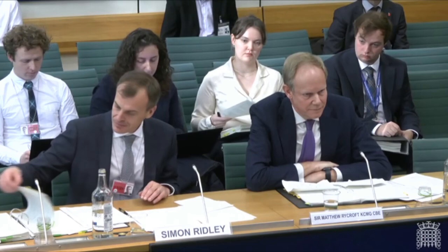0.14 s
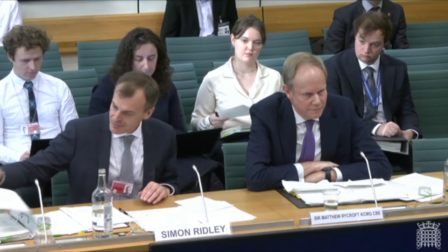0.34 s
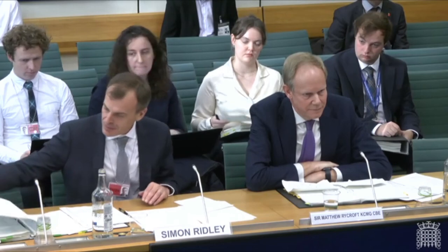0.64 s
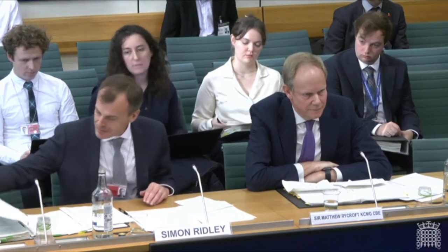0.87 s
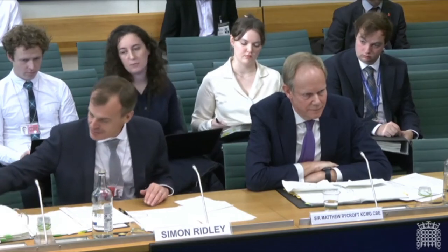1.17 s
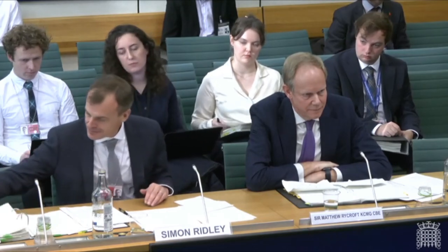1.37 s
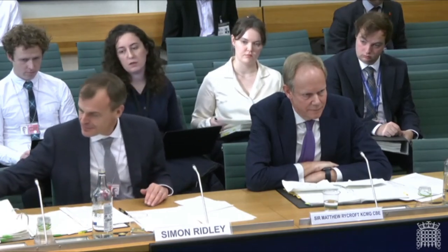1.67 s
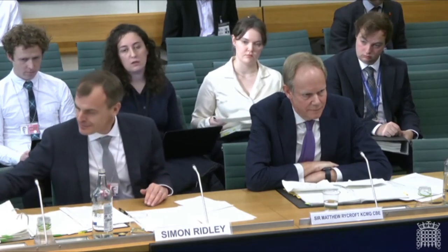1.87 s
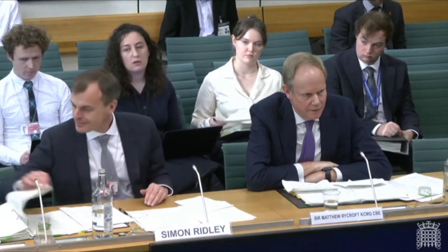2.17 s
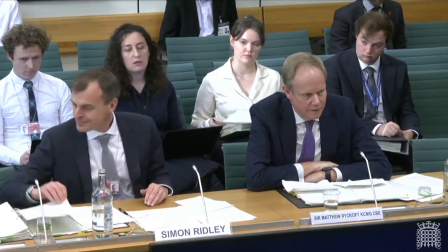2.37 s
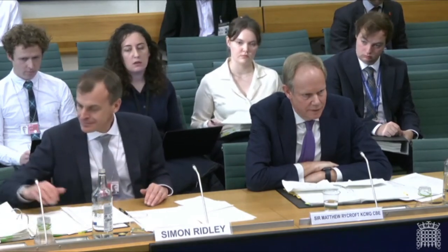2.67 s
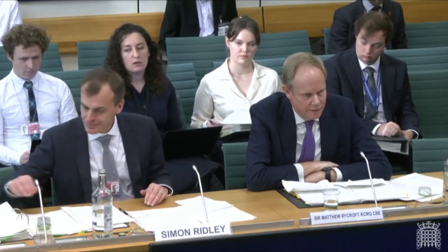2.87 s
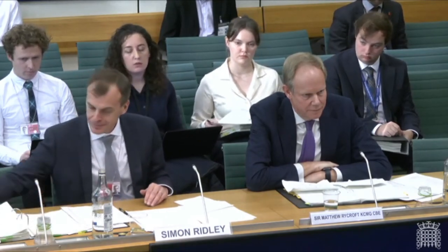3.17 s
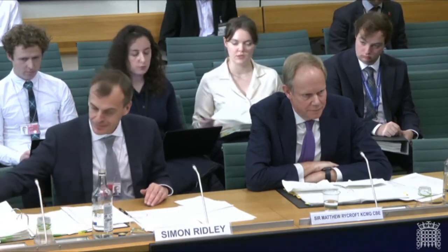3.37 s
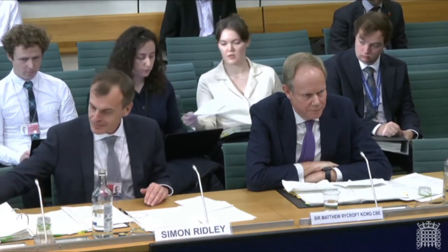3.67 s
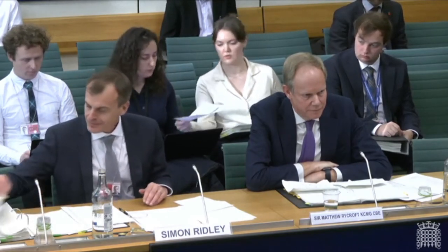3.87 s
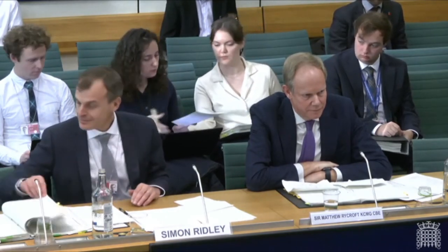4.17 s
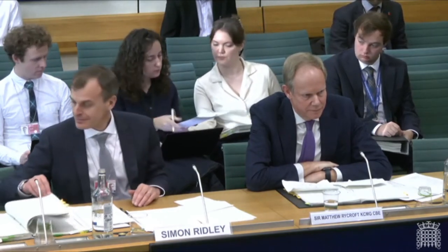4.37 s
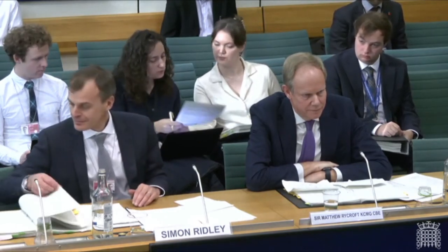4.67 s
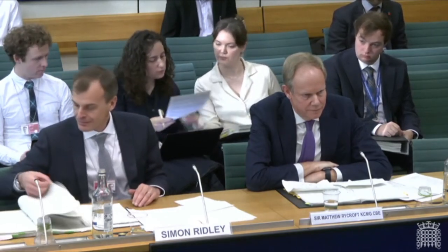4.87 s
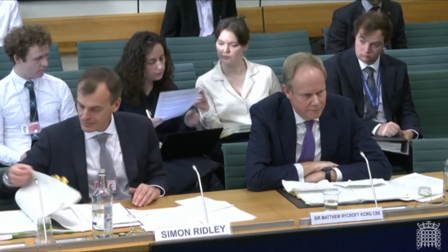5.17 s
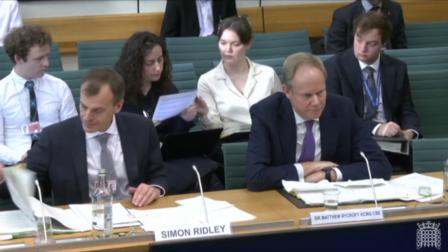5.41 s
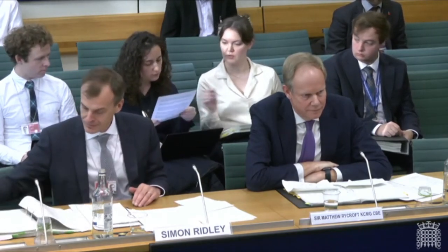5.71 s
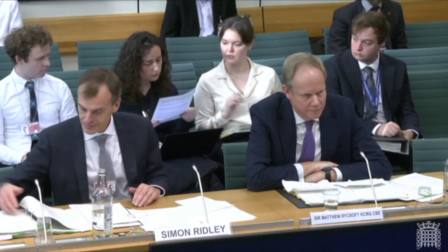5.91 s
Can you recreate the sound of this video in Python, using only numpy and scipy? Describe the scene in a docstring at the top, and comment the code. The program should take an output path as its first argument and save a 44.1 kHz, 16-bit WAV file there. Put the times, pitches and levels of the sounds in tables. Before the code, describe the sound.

A quiet meeting room heard through a desk microphone very near a thick file of paper. A very low, wavering hum and faint dull ventilation run throughout. From 0 to 1.3 seconds sheets slide softly, with a small snap and low knock at 0.7. At 1.4 a crisp crease and firm dull desk knock land together, followed by light rustling and ticks. Around 2.3 to 2.8 a falling page pushes air onto the microphone: a massive, deep, shuddering thump that briefly pulls down all other sound. From 3.0 knocks return, with a dense burst of sharp crackles and brushing paper at 3.35 to 3.6. It calms until a bright snap at 4.24, then rustling strokes and strong papery cracks at 4.8 and 4.95. Lighter page sliding follows, with a softer low air thud around 5.6 to 5.7 and a fading rustle to 6.

```python
"""A quiet meeting room, with a desk microphone close beside a thick file whose pages are lifted, slid and turned.
Strokes of sheet are swelling friction noise, creases snap as clicks in short noise, knocks ring the desk's modes.
A very low sine hum and coloured-noise ventilation lie underneath.
Twice a falling page blows on the capsule as pushes and suctions of air; the first time it also shakes
the microphone stem, and the limiter ducks everything."""
import sys
import numpy as np
from scipy import signal
from scipy.fft import rfft, irfft, next_fast_len
from scipy.io import wavfile
from scipy.ndimage import uniform_filter1d, minimum_filter1d, map_coordinates

SR = 44100
rng = np.random.default_rng(int(sys.argv[2]) if len(sys.argv) > 2 else 0)


def waveform_to_disk(signal):
    """Save audio, clipped to [-1, 1], as 16-bit WAV at the path in sys.argv[1]."""
    frames = np.transpose(np.atleast_2d(signal))
    scaled = np.clip(frames, -1, 1) * 32767
    samples = np.round(scaled).astype(np.int16)
    wavfile.write(sys.argv[1], SR, samples)


N = 266540
T = np.arange(N) / SR  # time of every sample [s]

# level of the low hum before it wavers: (time [s], level [dB])
HUM_LEVEL = [(0, -11), (1, -14), (2.4, -12.5), (3.1, -22), (4.1, -23.5), (4.42, -16.5), (4.62, -30.5),
             (4.9, -36.5), (5.06, -15.5), (6.04, -15.5)]
# level of the ventilation: (time [s], level [dB])
VENT_LEVEL = [(0, -37.5), (2.3, -37), (2.9, -45), (4.1, -42), (6.04, -41.5)]
# colour of the ventilation: (frequency [Hz], density [dB per Hz])
VENT_COLOUR = [(25, 0), (60, 4.5), (120, -.5), (210, -2.5), (300, -10), (500, -16), (1000, -25),
               (2000, -30), (4000, -40), (13000, -43.5)]

# strokes of a sliding sheet, levels before the paper colour:
# (peak time [s], rise [s], fall [s], flexing level [dB], rubbing level [dB], rubbing pitch [Hz],
#  edge hiss level [dB])
STROKES = [(0.119, 0.32, 0.62, -59, -67, 3370, -55.5), (.6, 0.1, 0.21, -56, -56.5, 3600, -63),
           (1.165, 0.048, 0.19, -48.5, -51.5, 3160, -55), (1.45, 0.23, 0.29, -44, -45, 3040, -49),
           (1.78, 0.26, .15, -55, -54, 3380, -43), (1.88, 0.11, 0.2, -53.5, -51, 2850, -53),
           (2.245, 0.032, 0.05, -45, -50.5, 3400, -51), (2.315, 0.022, 0.11, -42, -46, 3600, -37.5),
           (2.434, 0.095, 0.078, -36, -37, 1460, -74), (2.519, 0.097, 0.093, -43.5, -45, 2000, -70),
           (2.648, 0.068, 0.16, -36, -42, 1600, -70), (2.829, 0.33, 0.15, -57, -51.5, 4330, -75),
           (3.02, 0.18, 0.17, -45, -43, 3350, -42), (3.1, 0.047, 0.14, -44.5, -48, 3000, -45),
           (3.3, 0.33, 0.22, -65, -48.5, 2600, -47.5), (3.364, 0.023, 0.064, -35, -31, 2450, -34),
           (3.402, 0.052, 0.056, -33.5, -24.5, 1970, -51), (3.475, 0.06, 0.087, -41.5, -37, 2770, -50),
           (3.57, 0.056, 0.28, -49.5, -55, 3060, -64), (4.01, 0.11, 0.23, -63, -51, 4470, -51),
           (4.27, 0.14, 0.25, -47, -42.5, 3860, -48), (4.421, 0.09, 0.13, -42, -40, 2840, -45),
           (4.68, 0.24, 0.16, -47, -45.5, 2120, -50), (4.829, 0.12, 0.2, -40.5, -29.5, 3000, -38),
           (4.97, 0.12, 0.18, -48.5, -40, 1980, -72), (5.15, 0.21, 0.27, -56, -52, 2870, -50),
           (5.299, 0.093, 0.14, -48.5, -41.5, 3100, -41.5), (5.411, 0.089, 0.12, -50.5, -40.5, 3670, -40.5),
           (5.58, 0.11, 0.092, -44.5, -43.5, 3150, -46.5), (5.86, 0.32, 0.15, -52, -50.5, 2740, -52)]
FADE_DB, ROUND = 21.5, 1.165  # drop over one rise or fall time; roundness of the crest
REST_DB, REST_HZ = -68.5, 3600  # sheets that barely stir between strokes
# colour of a bending sheet: (frequency [Hz], density [dB per Hz])
FLEX_COLOUR = [(100, -43), (250, -5), (500, -2.5), (900, -4), (1500, -5.5), (3000, -23), (6000, -67)]
# colour of the sheet's edge: (frequency [Hz], density [dB per Hz])
EDGE_COLOUR = [(3000, -31.5), (5500, 1), (7600, 2), (9300, 2), (10800, 2.5), (12200, 5), (13000, -9.5)]
# gentle overall tone colour of the paper sounds: (frequency [Hz], gain [dB])
PAPER_COLOUR = [(280, -7.5), (380, 4.5), (540, -2.5), (700, 1.5), (940, 1.5), (1200, 1), (1600, 1.5),
                (2000, 0.5), (2450, 1), (2800, -1.5), (3000, -1.5), (3600, -1), (4200, 1), (7500, -1.5),
                (13000, -5)]

# snaps of a buckling sheet, levels before the paper colour:
# (time [s], flexing level [dB], crack level [dB], crack pitch [Hz], edge level [dB], length [s])
SNAPS = [(.726, -23.5, -33.5, 2400, -40.5, 0.0037), (1.4145, -20.5, -17, 2410, -17, 0.003),
         (1.547, -51, -39.5, 2730, -29.5, 0.0035), (1.593, -47, -38, 2100, -50, .0025),
         (1.616, -48, -37, 2000, -49, .003), (1.655, -28, -33.5, 1660, -36.5, 0.0038),
         (1.791, -35.5, -36, 3980, -34, 0.0032), (1.8014, -39, -25.5, 3240, -32, 0.0029),
         (1.87, -39, -44, 3640, -46, 0.0034), (2.147, -40, -49, 3660, -48, 0.0047),
         (2.233, -40, -44.5, 2790, -44, 0.0032), (3.004, -27.5, -29.5, 1600, -42, 0.0091),
         (3.1315, -36, -34, 1670, -59, .003), (3.182, -41, -28, 1880, -55, 0.0025),
         (3.359, -32, -15.5, 2610, -27, 0.0026), (3.368, -33, -19.5, 2290, -41, 0.003),
         (3.393, -12, -30, 2000, -24, 0.0011), (3.446, -31, -14.5, 3920, -26, .0017),
         (3.492, -33, -26, 3470, -28, 0.005), (3.538, -25.5, -28.5, 1230, -64, 0.0021),
         (4.166, -54, -41.5, 4020, -41, 0.0024), (4.225, -33, -27, 3720, -41, .0024),
         (4.2373, -21.5, -15.5, 3800, -6.5, 0.0013), (4.257, -22.5, -22.5, 2970, -21.5, 0.0042),
         (4.321, -31.5, -26.5, 2200, -54, 0.0028), (4.424, -29.5, -19, 1770, -58, 0.0011),
         (4.545, -45, -40.5, 3250, -44, 0.0035), (4.583, -43, -34.5, 1600, -62, 0.0027),
         (4.663, -53, -32, 2480, -64, 0.0025), (4.788, -36, -33, 1090, -55, 0.0097),
         (4.825, -25, -13.5, 2780, -54, 0.0033), (4.946, -45, -14.5, 2400, -57, 0.0036),
         (4.9535, -24.5, -9.5, 2270, -57, 0.0058), (4.966, -30, -22.5, 1900, -62, 0.0045),
         (5.2115, -52, -37, 2800, -45, 0.0051), (5.339, -42, -38, 2840, -50, 0.0089),
         (5.495, -41, -36.5, 2020, -43, 0.0053), (5.554, -31, -39, 2600, -41, 0.0023),
         (5.867, -38, -41.5, 2780, -43, 0.0049)]
CRINKLE_DB, CRINKLE_SPREAD_DB, CRINKLE_S = 7, 2, 0.006  # level over the stroke, spread, length

# dull knocks on the desk, before each mode is weighted: (time [s], level [dB], contact pitch [Hz])
KNOCKS = [(.72, -27.5, 90.5), (1.22, -37.5, 295), (1.385, -19, 198), (2.144, -32.5, 164.3),
          (2.999, -26.5, 497), (3.387, -24, 573), (3.538, -27, 470), (3.562, -21.5, 164),
          (3.727, -25.5, 185), (4.002, -43.5, 278), (4.25, -33, 373)]
# modes of the desk: (frequency [Hz], relative level [dB], time to fall 60 dB [s], capped for the pure ring)
DESK_MODES = [(114, 1.5, .2), (177, -8, 0.1), (295, -1, 0.088), (450, -7, 0.1)]
# noise around a desk mode: (frequency as a multiple of the mode, density [dB per Hz])
MODE_BLUR = [(1 / 4, -16), (1 / 2, -6), (1, 0), (1.28, -7), (1.57, -20), (6, -36)]
RING_T60_S = 0.09  # longest pure ring

# reverberation of the room: (frequency [Hz], time to fall 60 dB [s])
ROOM_T60 = [(100, 0.9), (1000, 0.63), (4000, 0.13), (12000, 0.31)]

# air pushed onto the capsule by a falling page: (turn from push to suction [s], peak level [dB], centre [Hz])
PUFFS = [(2.388, 4, 114), (2.3889, -6.5, 340), (2.389, -3.5, 44), (2.441, 7.5, 14.5), (2.488, 14, 34),
         (2.489, -10, 183), (2.708, 6, 9.7), (5.602, -3.5, 19.2), (5.651, 0.5, 12.3), (5.678, -8.5, 41),
         (5.696, -2.5, 16.1)]
# the microphone stem
SHAKE_AT_S, SHAKE_RISE_S, SHAKE_HOLD_S, SHAKE_FALL_S = 2.49, 0.15, 0.14, 0.13
SHAKE_DB = -1.5  # level of the sway before it wavers
# rumble of the stem: (frequency [Hz], density [dB per Hz])
STEM_RUMBLE = [(20, -11), (60, 12.0), (100, -6.0), (160, -23.0), (300, -42.0), (1000, -92.5)]

LIMIT_DB, LIMIT_HOLD_S, RELEASE_DB_PER_S = -0.74, 0.2, 54  # the limiter
TOP_HZ = 13080  # band limit


def amp(db):
    """Decibels to gain."""
    return 10 ** (np.asarray(db) / 20)


def unit(x):
    """Scale to rms 1."""
    return x / np.sqrt(np.mean(x ** 2) + 1e-20)


def along(points, hz):
    """Read (Hz, value) points on a log axis."""
    f, v = np.transpose(points)
    return np.interp(np.log(hz + 1), np.log(f + 1), v)


def curve(rows):
    """One value per sample from (s, value) points."""
    return np.interp(T, *np.transpose(rows))


def wobble(rate):
    """A smooth random curve, rate knots a second."""
    return map_coordinates(rng.standard_normal(1024), [T * rate], mode="mirror")


def filtered(x, gain):
    """x times a gain that depends on frequency."""
    m = next_fast_len(len(x) + 8192)
    hz = np.fft.rfftfreq(m, 1 / SR)
    return irfft(rfft(x, m) * gain(hz), m)[:len(x)]


def coloured(x, points):
    """x shaped by (Hz, dB) points, at rms 1."""
    return unit(filtered(x, lambda hz: amp(along(points, hz))))


def add(track, s, sound):
    """Mix a sound in at time s."""
    i = max(0, round(s * SR))
    track[i:i + len(sound)] += sound[:max(0, N - i)]


def hump(hz, centre_hz):
    """A broad resonance, even on an octave scale."""
    octaves = np.log2((hz + 1) / centre_hz)
    return (1 + (octaves / 1.18) ** 2) ** -2


def hum(hz):
    """A very low, pure hum whose level wavers."""
    level_db = curve(HUM_LEVEL) + 0.25 * wobble(13)
    return amp(level_db) * unit(np.sin(2 * np.pi * hz * T))


def ventilation():
    """A dull rush of air: noise with most of its power in the bass."""
    return amp(curve(VENT_LEVEL)) * coloured(rng.standard_normal(N), VENT_COLOUR)


def swell_db(peak_s, rise_s, fall_s, hold_s=0):
    """Level of one movement: rise, hold at 0 dB, fall."""
    before = (peak_s - T) / rise_s
    after = (T - peak_s - hold_s) / fall_s
    return -FADE_DB * np.clip(np.maximum(before, after), 0, 10) ** ROUND


def strokes():
    """Overlapping strokes add in power, and the rubbing pitch is their mean weighted by that power."""
    power = np.full((3, N), amp(REST_DB) ** 2) * [[1], [1], [0]]  # flexing, rubbing, edge
    pitch = power[1] * REST_HZ
    for s, rise, fall, flex_db, rub_db, pitch_hz, edge_db in STROKES:
        levels = amp([[flex_db], [rub_db], [edge_db]])
        part = (levels * amp(swell_db(s, rise, fall))) ** 2
        power = power + part
        pitch = pitch + part[1] * pitch_hz
    flex_db, rub_db, edge_db = 10 * np.log10(power + 1e-20)
    return flex_db, rub_db, pitch / power[1], edge_db


def fibres(rate, spread_db, share):
    """Friction of rms 1: smooth noise plus tiny catches at random moments, rate a second."""
    struck = rng.random(N) < rate / SR
    sign = rng.choice([-1, 1], N)
    size = amp(spread_db * np.minimum(rng.exponential(size=N), 3))
    catches = struck * sign * size
    return unit(rng.standard_normal(N) + share * unit(catches))


def slide(motion):
    """Sheets rub over each other as they bend; the rubbing pitch moves as the page curls."""
    flex_db, rub_db, pitch_hz, edge_db = motion
    grip_db = 1.5 * wobble(170)
    hz, t, z = signal.stft(fibres(rate=310, spread_db=0, share=0.69), SR, nperseg=512)
    shape = hump(hz[:, None], np.interp(t, T, pitch_hz))
    # the curling page favours ever-changing narrow bands
    patches = uniform_filter1d(rng.standard_normal(z.shape), size=3, axis=0)
    patches = unit(uniform_filter1d(patches, size=7, axis=1))
    shape = shape * amp(2.5 * patches)
    shape = shape / np.sqrt(np.mean(shape ** 2, axis=0))
    rub = signal.istft(z * shape, SR, nperseg=512)[1][:N]
    flex = coloured(fibres(rate=440, spread_db=2.5, share=0.76), FLEX_COLOUR)
    edge = coloured(fibres(rate=940, spread_db=11.5, share=0.34), EDGE_COLOUR)
    body = amp(flex_db) * flex + amp(rub_db) * rub
    return amp(grip_db) * body + amp(edge_db) * edge


def crinkles(motion, count):
    """Small snaps at random moments take their strength and brightness from the stroke under way."""
    rows = []
    for i, strength in zip(rng.integers(N, size=count), rng.uniform(-1, 1, count)):
        flex_db, rub_db, pitch_hz, edge_db = (control[i] for control in motion)
        over_db = CRINKLE_DB + CRINKLE_SPREAD_DB * strength
        rows.append((T[i], flex_db + over_db, rub_db + over_db, pitch_hz, edge_db, CRINKLE_S))
    return rows


def snaps(rows):
    """A crease pops through with one sharp click inside a short spray of breaking fibres."""
    out = np.zeros(N)
    t = np.arange(-1024, 3072) / SR  # the click falls at 0
    click = 0.55 * unit(1.0 * (t == 0))
    for s, flex_db, crack_db, pitch_hz, edge_db, length in rows:
        # the spray rises in under half the time it takes to die
        swell = np.exp(np.where(t < 0, t / 0.45, -t) / max(length, 0.0006))

        def pop():
            """Fresh spray around the click."""
            return unit(swell * rng.standard_normal(len(t))) + click

        crack = unit(filtered(pop(), lambda hz: hump(hz, pitch_hz)))
        flex = coloured(pop(), FLEX_COLOUR)
        edge = coloured(pop(), EDGE_COLOUR)
        sound = amp(flex_db) * flex + amp(crack_db) * crack + amp(edge_db) * edge
        add(out, s + t[0], sound * np.sqrt(np.mean(swell ** 2)))
    return out


def burst(points, attack, t60):
    """A short coloured noise that swells and dies; its loudest moment has rms near 1."""
    t = np.arange(SR // 2) / SR
    shape = (1 - np.exp(-t / attack)) * amp(-60 * t / t60)
    shape /= shape.max()
    noise = coloured(rng.standard_normal(len(t)), points)
    return unit(noise * shape) * np.sqrt(np.mean(shape ** 2))


def knocks():
    """A soft blow rings the desk modes nearest its own pitch, each inside a blur of its neighbours."""
    out = np.zeros(N)
    t = np.arange(SR // 2) / SR
    for s, db, contact_hz in KNOCKS:
        for hz, mode_db, t60 in DESK_MODES:
            decay = amp(-60 * t / min(t60, RING_T60_S))
            ring = np.sin(2 * np.pi * hz * t) * (1 - np.exp(-t / 0.0013)) * decay
            blur_colour = [(hz * ratio, density) for ratio, density in MODE_BLUR] + [(13000, -70)]
            blur = burst(blur_colour, attack=0.0054, t60=t60)
            gain = amp(db + mode_db) * hump(hz, contact_hz)
            add(out, s, gain * (1.29 * ring + 0.9 * blur))
    return out


def room(x):
    """A diffuse tail of decaying noise, each frequency dying at its own rate."""
    hz, t, z = signal.stft(rng.standard_normal(SR // 2), SR, nperseg=256)
    decay = amp(-60 * t / along(ROOM_T60, hz)[:, None])
    tail = signal.istft(z * decay, SR, nperseg=256)[1]
    return signal.fftconvolve(x, tail / np.linalg.norm(tail))[:N]


def thumps():
    """Each puff is a push followed by suction; the microphone stem shudders around the strongest."""
    out = np.zeros(N)
    for s, db, hz in PUFFS:
        u = 2 * np.pi * hz * (T - s)
        out -= amp(db) * u * np.exp((1 - u * u) / 2)
    sway_hz = 49 + 6 * wobble(22)
    sway = unit(np.sin(2 * np.pi * np.cumsum(sway_hz) / SR))
    rumble = coloured(rng.standard_normal(N), STEM_RUMBLE)
    shake_db = SHAKE_DB + swell_db(SHAKE_AT_S, SHAKE_RISE_S, SHAKE_FALL_S, SHAKE_HOLD_S)
    shake_db = shake_db + 1.3 * wobble(24.5)
    return out + amp(shake_db) * (sway + amp(-6) * rumble)


def limited(x):
    """The gain drops just ahead of any peak over the ceiling, holds, then climbs back."""
    ahead = SR // 300
    span = ahead + int(LIMIT_HOLD_S * SR)
    needed_db = np.minimum(0, LIMIT_DB - 20 * np.log10(np.abs(x) + 1e-9))
    held_db = minimum_filter1d(needed_db, span, origin=(span - 1) // 2 - ahead)
    climb_db = RELEASE_DB_PER_S * T
    gain_db = np.minimum.accumulate(held_db - climb_db) + climb_db
    return x * amp(uniform_filter1d(gain_db, 2 * ahead))


def scene():
    """Paper and desk close by with a room tail, the thumps right at the capsule, hum and air beneath."""
    motion = strokes()
    cracks = snaps([*SNAPS, *crinkles(motion, count=60)])
    blows = knocks()
    paper = filtered(slide(motion) + cracks, lambda hz: amp(along(PAPER_COLOUR, hz)))
    tail = room(amp(-18.0) * cracks + amp(-13.5) * blows)
    return (paper + blows + tail + thumps() + hum(hz=20.8) + ventilation())[None]


def record(dry):
    """A limiter catches the largest peaks; a very steep low-pass then sets the band limit."""
    return filtered(limited(dry[0]), lambda hz: 1 / np.sqrt(1 + (hz / TOP_HZ) ** 240))[None]


dry = scene()
out = record(dry)
waveform_to_disk(out)
```